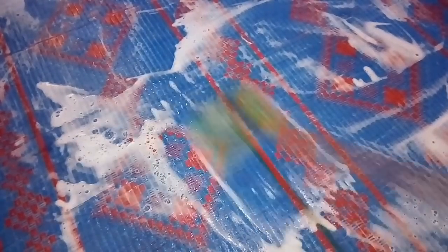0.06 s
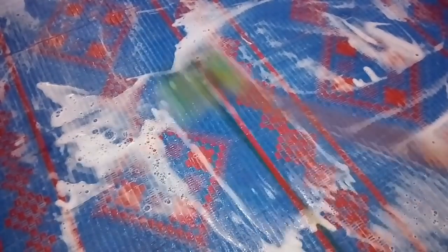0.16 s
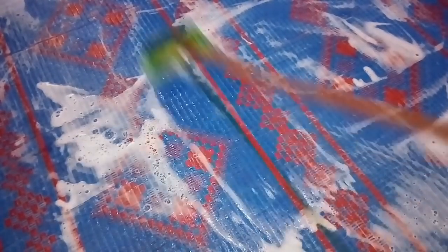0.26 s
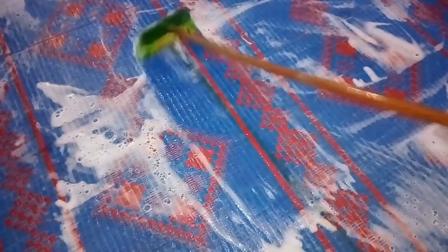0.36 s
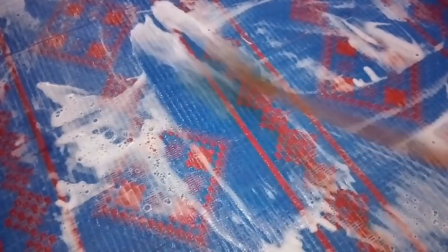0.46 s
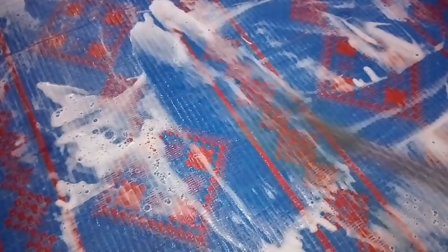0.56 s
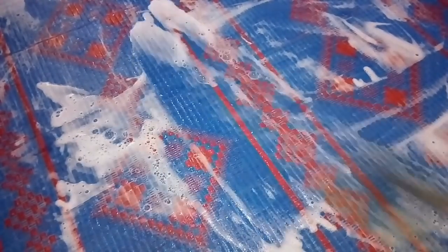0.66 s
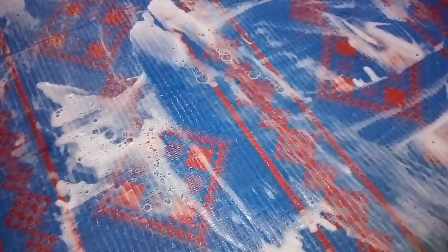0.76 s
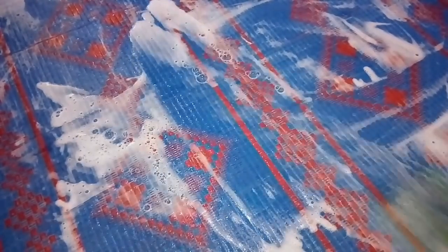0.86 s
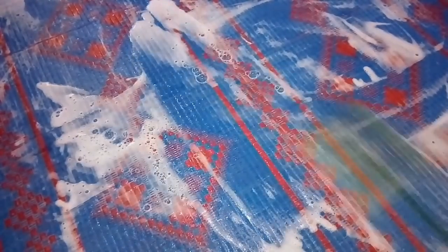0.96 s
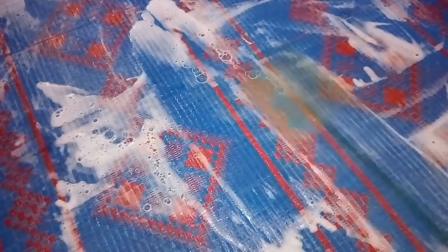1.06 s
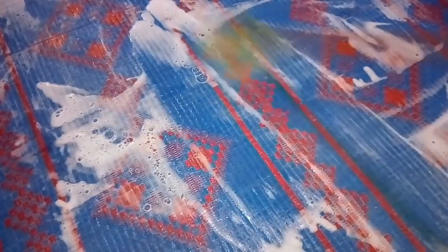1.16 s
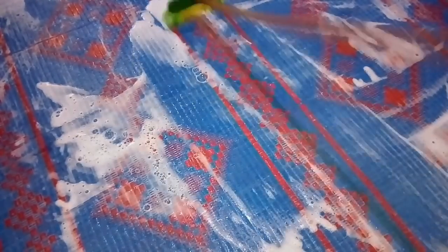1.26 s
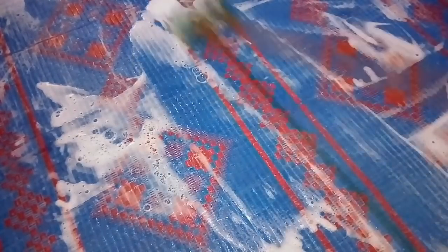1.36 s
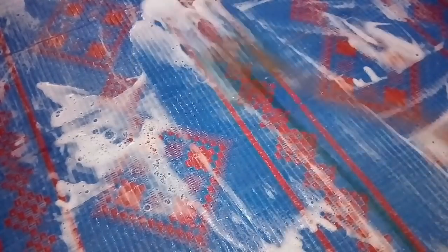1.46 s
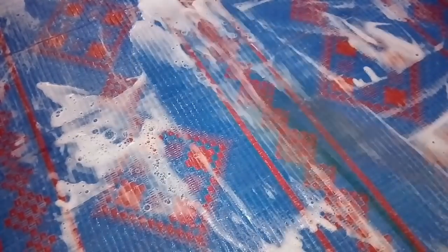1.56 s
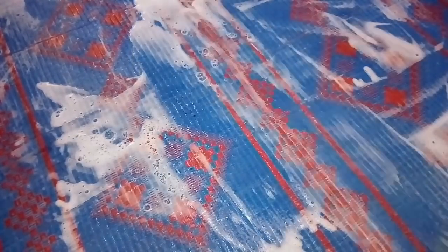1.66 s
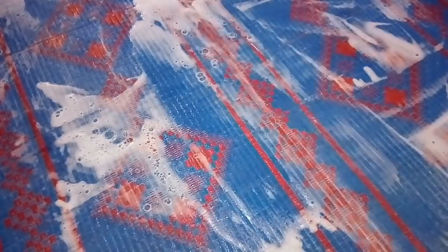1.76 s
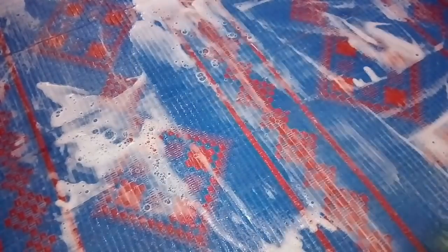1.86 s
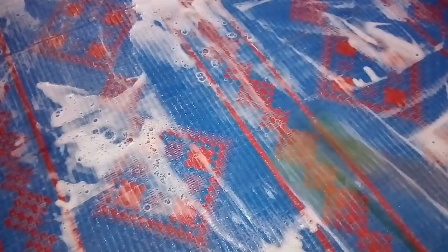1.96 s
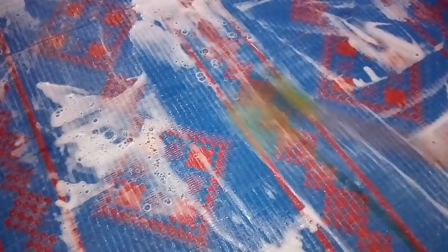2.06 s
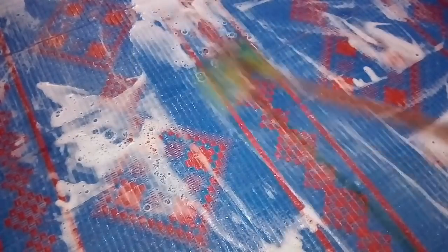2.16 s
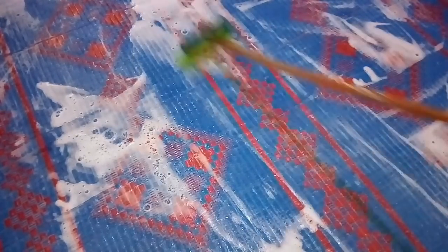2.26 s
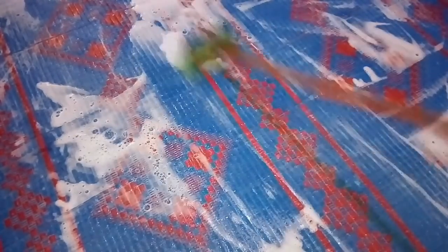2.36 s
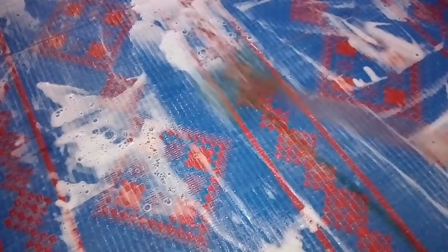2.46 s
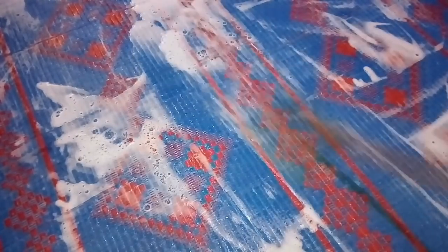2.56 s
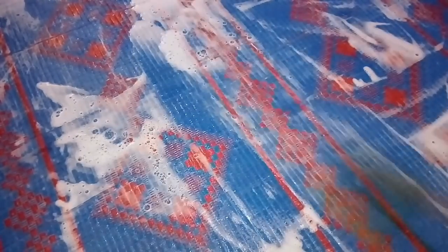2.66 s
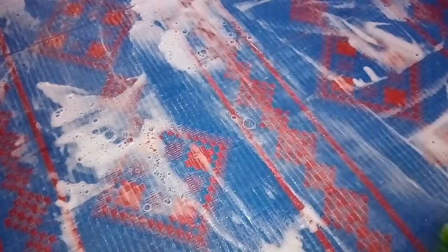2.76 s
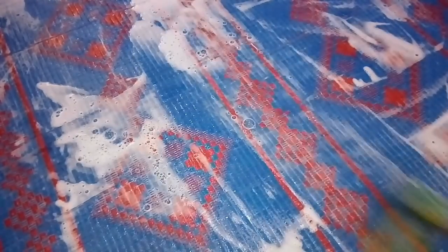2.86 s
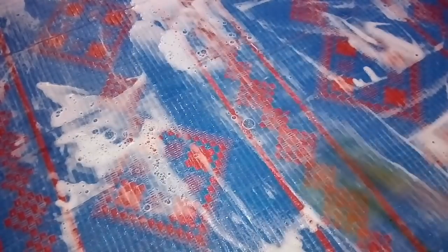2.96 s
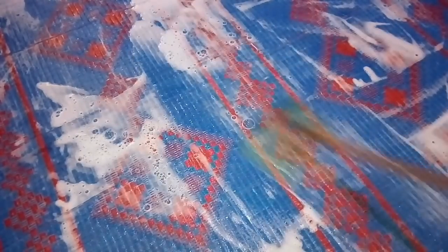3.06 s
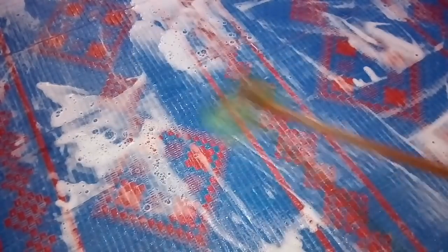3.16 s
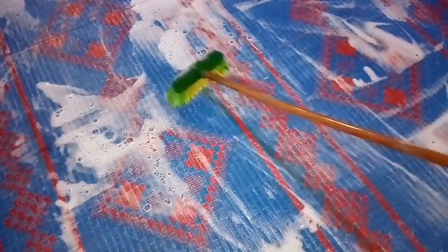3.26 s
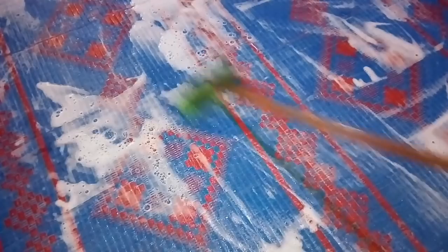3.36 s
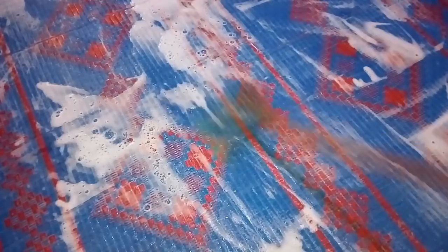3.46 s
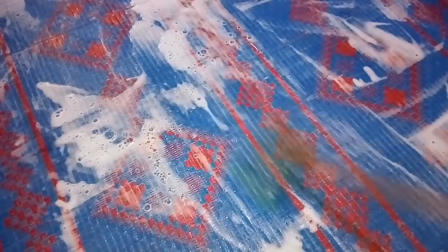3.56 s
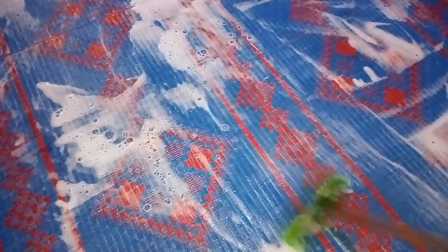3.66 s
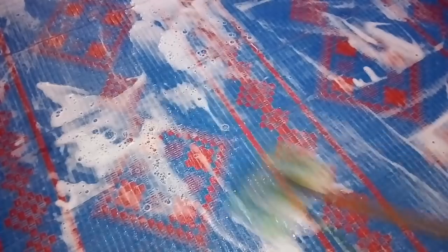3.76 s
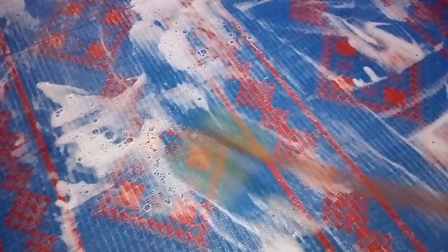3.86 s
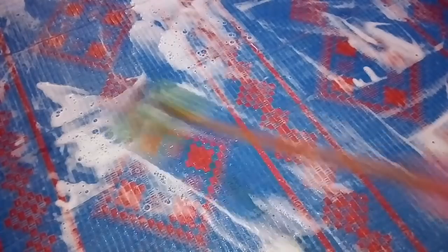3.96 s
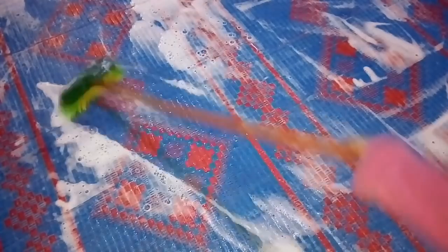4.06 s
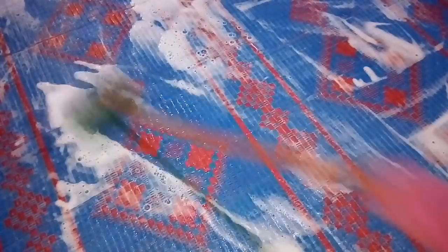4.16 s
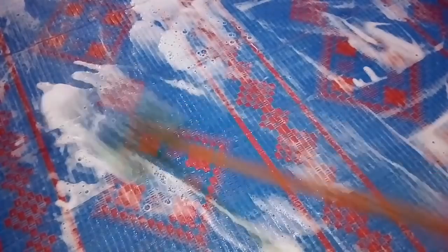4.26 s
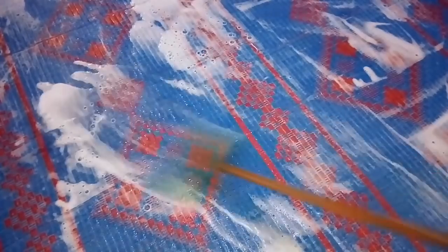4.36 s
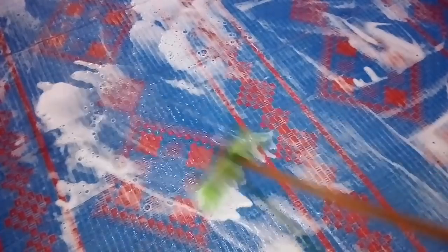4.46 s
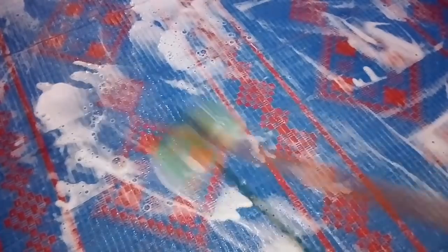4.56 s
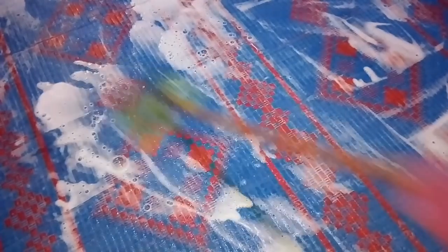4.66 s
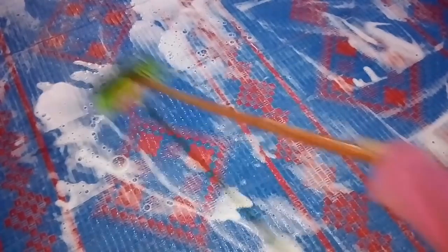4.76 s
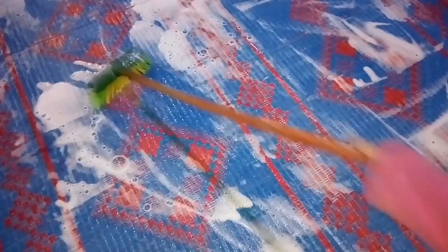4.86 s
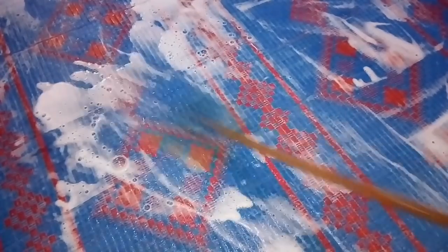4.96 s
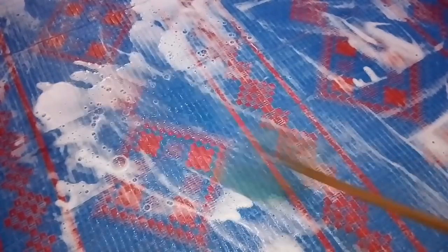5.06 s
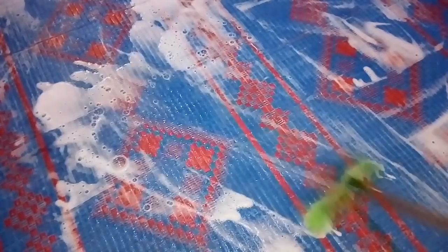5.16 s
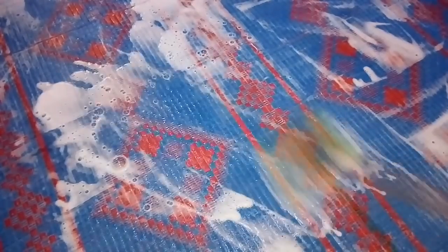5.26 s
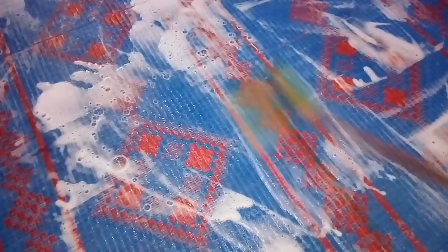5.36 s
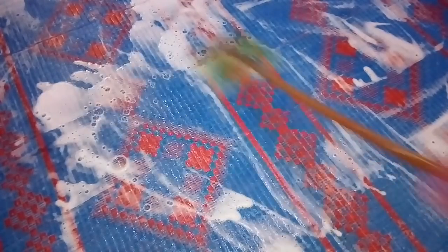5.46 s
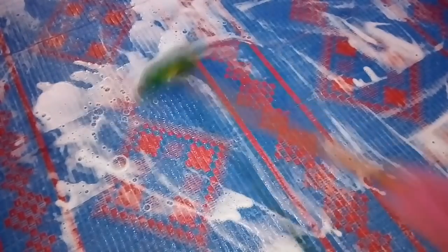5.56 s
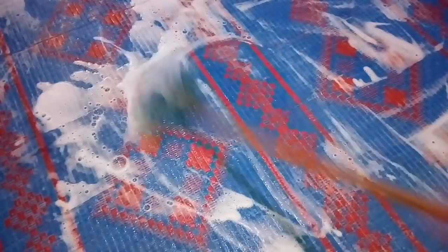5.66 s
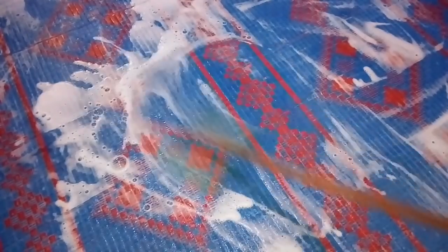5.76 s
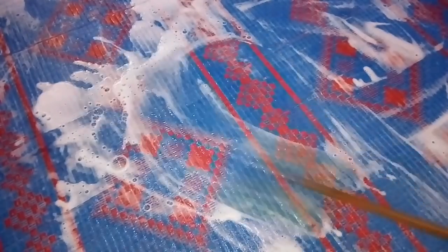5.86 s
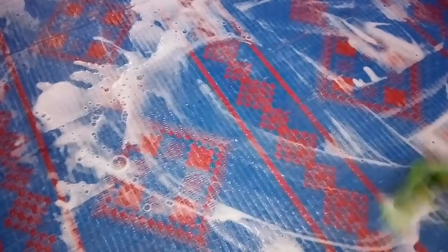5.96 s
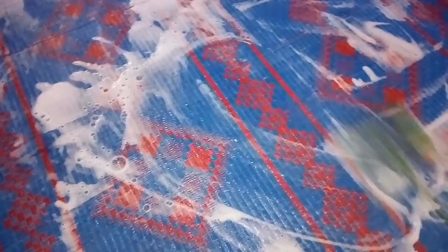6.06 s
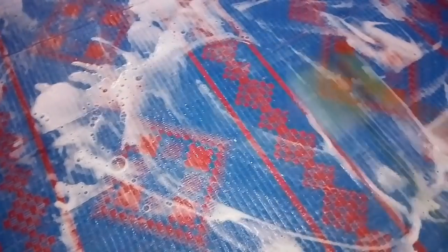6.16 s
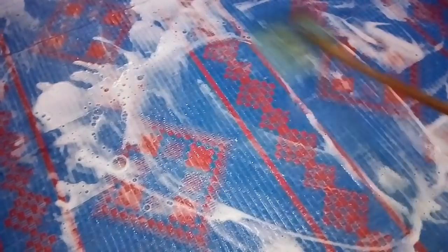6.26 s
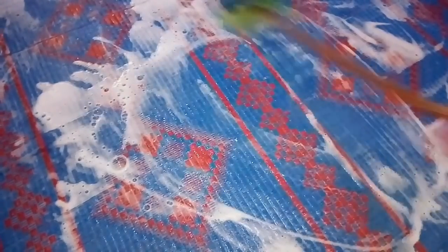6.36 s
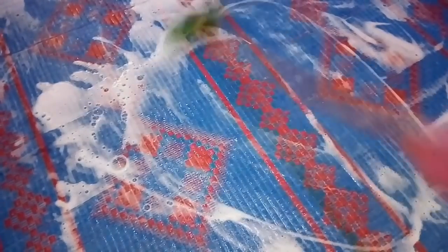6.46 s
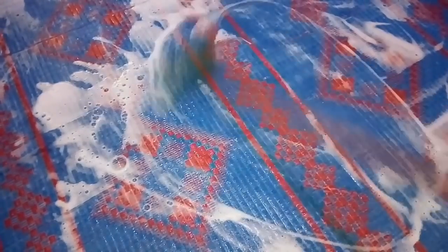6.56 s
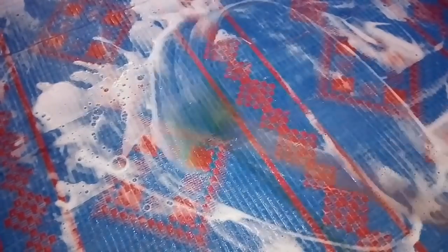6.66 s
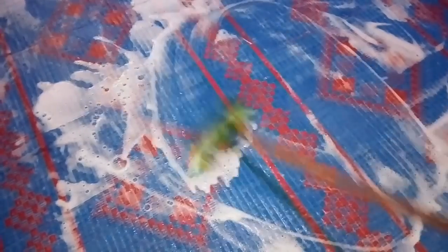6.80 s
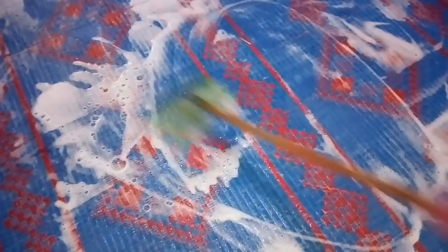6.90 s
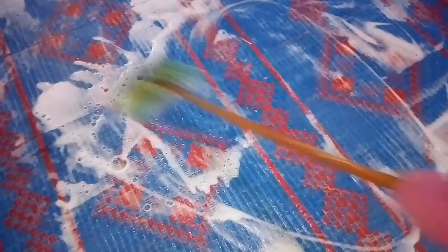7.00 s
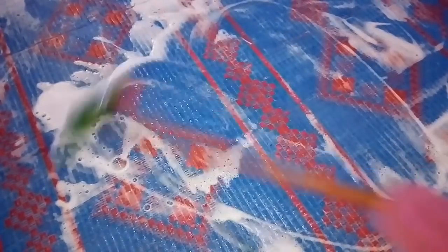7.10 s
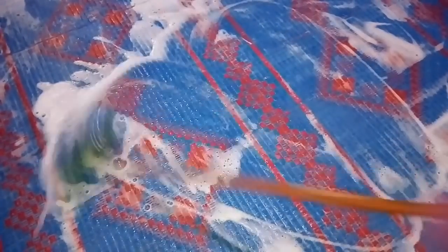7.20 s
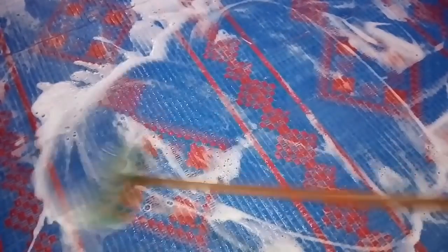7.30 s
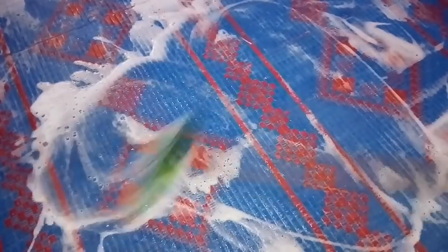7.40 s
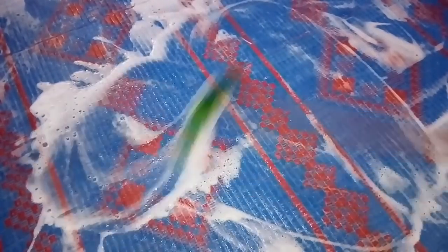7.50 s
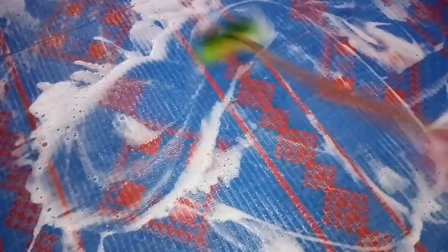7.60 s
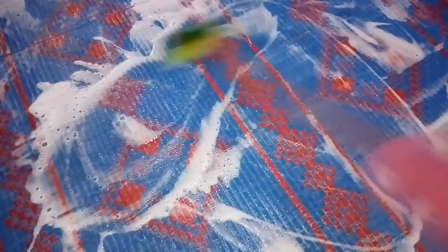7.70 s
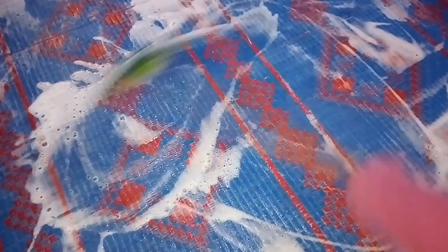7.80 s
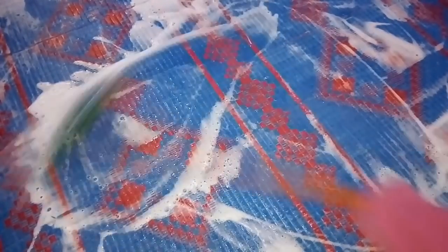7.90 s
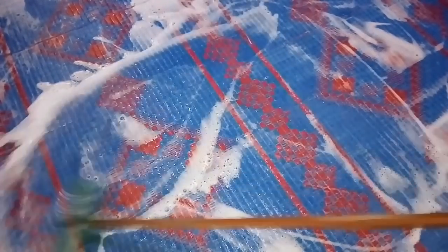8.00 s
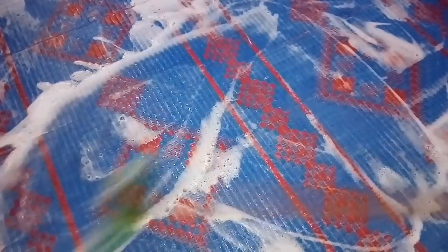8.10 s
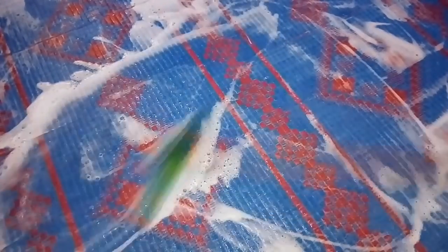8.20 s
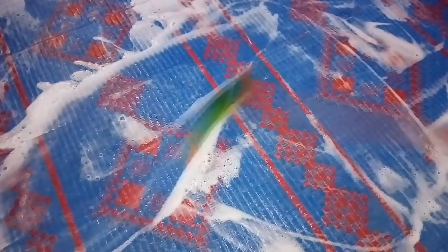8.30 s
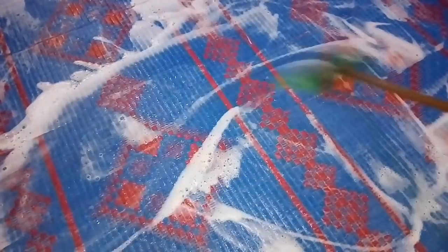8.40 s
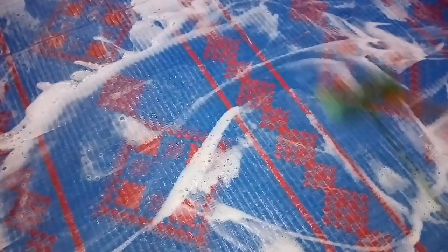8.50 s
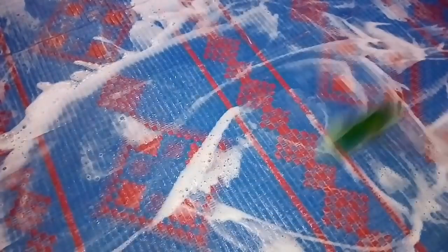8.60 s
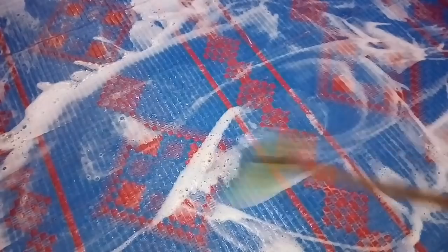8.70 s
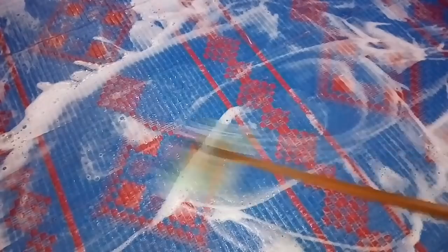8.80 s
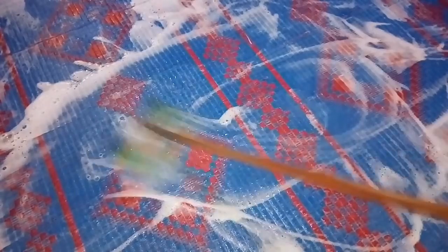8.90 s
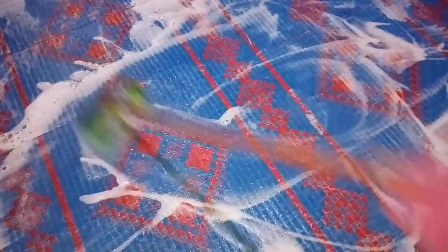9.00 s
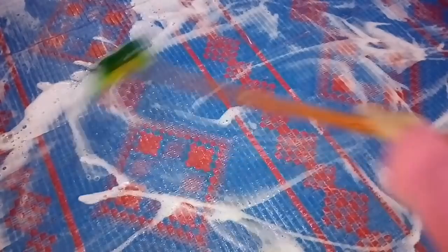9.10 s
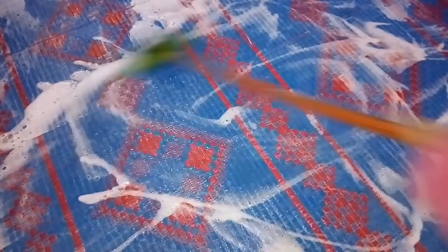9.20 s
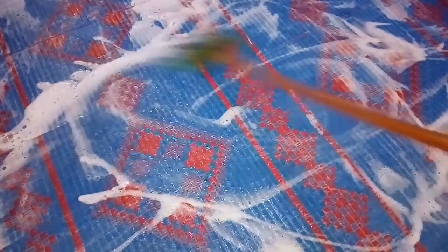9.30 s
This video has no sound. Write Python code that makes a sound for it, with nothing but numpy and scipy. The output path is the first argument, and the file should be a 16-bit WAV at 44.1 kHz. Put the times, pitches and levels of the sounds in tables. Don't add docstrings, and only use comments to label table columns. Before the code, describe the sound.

A long-handled stiff brush scrubs a soapy woven plastic mat in a small hard room, picked up close in stereo. From 0 to about 3.4 s strong strokes alternate roughly every half second, each a dense raspy hiss with fine suds fizz and a fuzzy, wavering hum as tufts cross the ribs; the wet mat drums dully beneath. Soft air bumps touch the left side near 0.7 s, with a harder thump at 2.1 s. Strokes from 3.5 to 5.9 s vary in pressure, with heavy left thumps at 4.3-4.4 and 4.8 s and a clear plastic tap at 4.25 s. The loudest, humming scrape comes at 6.2 s. Afterward the sweeps are softer and lower, with a small bright tick at 7.9 s, fading to faint swishes and more left-side air thumps around 8.9-9.1 s over very quiet room noise.

```python
import sys
import numpy as np
from scipy import signal
from scipy.io import wavfile
from scipy.ndimage import uniform_filter1d

SR = 44100
rng = np.random.default_rng(int(sys.argv[2]) if len(sys.argv) > 2 else 0)


def elevation(decibels):
    levels = np.asarray(decibels, float)
    return 10 ** (levels / 20)


def dump(signal):
    limited = np.clip(np.atleast_2d(signal).T, -1, 1)
    pcm = np.round(limited * 32767).astype(np.int16)
    wavfile.write(sys.argv[1], SR, pcm)


N = 411894
HOP = 128
LEFT_ONLY = np.array([[0], [-90]])


def evened(x):
    return x / np.sqrt(np.mean(x ** 2) + 1e-20)


def read(points, hz):
    f, value = np.transpose(points)
    return np.interp(np.log(hz + 1), np.log(f + 1), value)


def add(mix, s, sound):
    part = mix[max(round(s * SR), 0):][:len(sound)]
    part += sound[:len(part)]


def wander(size):
    once = uniform_filter1d(rng.standard_normal(N), size)
    return evened(uniform_filter1d(once, size))


def swell(middle, db, before, after, blunt, lead=0):
    u = np.arange(N // HOP + 2)[:, None] * HOP / SR + lead - middle
    reach = np.where(u < 0, before, after)
    return elevation(db - 20 * abs(u / reach) ** np.maximum(blunt, 1)) ** 2


def even(rows, lead=0):
    s, db, half = np.transpose(rows)
    return swell(s, db, half, half, 1.5, lead)


def spread(frames):
    return np.interp(np.arange(N) / HOP, np.arange(len(frames)), frames)


def level(power, rest_db):
    return spread(10 * np.log10(power.sum(axis=1) + elevation(rest_db) ** 2))


def tune(rows, rest_db):
    s, hz, db, half = np.transpose(rows)
    power = swell(s, db, half, half, 1.5)
    distance_s = abs(np.arange(len(power))[:, None] * HOP / SR - s)
    weight = power + 1e-12 * np.exp(-20 * distance_s)
    return spread((weight * hz).sum(axis=1) / weight.sum(axis=1)), level(power, rest_db)


def resonate(x, hz, width_hz, steady=0):
    turn = np.exp(2j * np.pi * np.cumsum(hz) / SR)
    r = np.exp(-np.pi * width_hz / SR)
    once = signal.lfilter([1 - r], [1, -r], x / turn)
    low = signal.lfilter([1 - r], [1, -r], once)
    return evened((turn * low).real / (abs(low) + 1e-6) ** np.clip(steady, 0, .9))


# (middle [s], frequency [Hz], change [dB], half length [s])
HEAD_TILTS = [(0.802, 4230, -2, 0.15), (1.55, 1500, -2.5, 0.15), (2.27, 1800, 3, 0.061),
              (2.28, 4500, 0, .05), (3.0, 2100, 1.5, 0.081), (3.28, 2200, 3, .07), (3.398, 4500, 7, .04),
              (3.784, 4950, -2.5, 0.11), (4.1, 1400, 6, .08), (4.2, 3800, -4, 0.046), (4.533, 1700, 4, .07),
              (4.7, 3300, 2, .05), (4.85, 1500, 5, .1), (5.267, 5240, -5.5, 0.056), (5.42, 5800, 2, 0.093),
              (5.75, 5500, -1, .08), (5.8, 1440, 3, .12), (5.9, 5300, -4, 0.045), (6.0, 6200, 4, 0.059),
              (6.088, 4730, -4.5, 0.083), (6.05, 2300, 5, .04), (6.25, 1400, -2, .09),
              (6.294, 3800, 3.5, .05), (6.6, 4900, -2.5, 0.13), (6.8, 2800, 3, .04),
              (7.075, 2600, -5.5, 0.072), (7.382, 4900, -5, 0.071), (7.63, 1590, -3, 0.11),
              (7.62, 4900, 3, 0.13), (7.85, 5300, 2.5, 0.1), (8.28, 2000, 2, .05), (8.43, 1400, -4, .1),
              (8.42, 6000, 1.5, .07), (8.8, 3500, 2, .08), (8.923, 6260, 2, 0.18), (9.28, 1500, -8, .07),
              (0.89, 4960, -2, 0.052), (1.054, 1500, 2, .12), (2.55, 3000, 1.5, 0.11),
              (6.74, 4000, -2, .03), (7.1, 4000, -3, 0.077), (0.153, 1500, 1.5, .1),
              (3.68, 3500, -2, 0.058), (5.05, 7000, -0.5, .1)]


def tilts(hz, t):
    s, middle_hz, db, half = np.transpose(HEAD_TILTS)
    octaves = np.log2((hz[:, None] + 1) / middle_hz)
    band = np.exp(-(octaves / 0.36) ** 2)
    return (band * db) @ np.exp(-((t - s[:, None]) / half[:, None]) ** 2)


# (frequency [Hz], left-right likeness [0 to 1])
PORT_LIKENESS = [(60, 0), (130, .2), (290, .72), (640, .2), (1400, .05), (2500, .12), (5000, 0), (15000, 0)]
# (frequency [Hz], left minus right [dB])
PORT_BALANCE = [(60, 0), (180, 1), (550, 1.5), (1650, -1.5), (4970, 0.5), (15000, 7.5)]


def coloured(pair, spectrum, patchy_db, tilted=False):
    frame = {"nperseg": 512, "noverlap": 512 - HOP}
    hz, t, (a, b) = signal.stft(pair, SR, **frame)
    patches = rng.standard_normal((len(t), len(hz))).T
    patches = uniform_filter1d(patches, size=7, axis=0)
    patches = evened(uniform_filter1d(patches, size=24, axis=1))
    same = np.clip(read(PORT_LIKENESS, hz), -1, 1)[:, None]
    lean_db = read(PORT_BALANCE, hz)[:, None]
    right = same * a + np.sqrt(1 - same ** 2) * b
    z = np.array([a * elevation(lean_db / 2), right * elevation(-lean_db / 2)])
    gain_db = read(spectrum, hz)[:, None] + patchy_db * patches
    if tilted:
        gain_db = gain_db + tilts(hz, t)
    out = signal.istft(z * elevation(gain_db), SR, **frame)[1][:, :N]
    return out / np.sqrt(np.mean(out.mean(axis=0) ** 2))


# (frequency [Hz], density [dB per Hz])
ROOM_SPECTRUM = [(18, -1.5), (30, -26), (95, -5), (169, -6), (257, -5.5), (391, -5.5), (1490, -0.5),
                 (1830, -3), (2140, -3.5), (11800, -34), (15700, -71)]


def room_tone():
    return elevation(-60.5) * coloured(rng.standard_normal((2, N)), ROOM_SPECTRUM, 2.2)


# (middle [s], eddy rate [Hz], level [dB], half length [s])
EDDIES = [(0.66, 90, -53.5, 0.2), (0.86, 94.5, -54, 0.11), (2.19, 94.7, -52, 0.058),
          (4.46, 108, -46, 0.041), (8.75, 79.6, -56, 0.045), (9.05, 101, -45.5, .17),
          (9.27, 78, -63, 0.097), (1.72, 170, -65, .1), (2.78, 140, -70, .08), (3.38, 90, -72, .12),
          (5.05, 130, -69, .12), (5.6, 110, -69, .12), (6.8, 100, -71, .1)]


def draughts():
    hz, db = tune(EDDIES, -102)
    return elevation(db) * resonate(rng.standard_normal(N), hz, 120) * elevation(LEFT_ONLY)


# (time [s], peak level [dB], swing rate [Hz], length [s])
GUSTS = [(0.686, -31, 73, 0.021), (0.701, -31, 78, 0.022), (0.726, -34.5, 126, 0.0098),
         (0.774, -39.5, 90, 0.018), (2.123, -34, 109, 0.007), (2.136, -17.5, 108, 0.013),
         (2.155, -31, 95, 0.017), (4.333, -16.5, 113, 0.0086), (4.345, -19.5, 109, 0.018),
         (4.364, -25, 114, 0.018), (4.397, -27, 155, 0.024), (4.409, -18.5, 150, 0.0089),
         (4.419, -13, 200, 0.0066), (4.428, -26, 126, 0.024), (4.799, -20, 139, 0.01),
         (4.832, -35, 120, 0.0091), (8.9, -31, 139, 0.0087), (8.916, -21.5, 127, 0.012),
         (8.939, -34, 114, 0.05), (8.973, -35, 98, 0.018), (9.044, -33, 98, 0.022),
         (9.073, -33, 126, 0.0052), (9.135, -38, 98, 0.034), (4.785, -36, 141, 0.017),
         (9.112, -38, 110, 0.016), (8.745, -47, 75, 0.025), (9.255, -48, 75, 0.025),
         (4.44, -32, 130, 0.015), (4.404, -36, 540, 0.014), (4.412, -29.5, 338, 0.011),
         (4.418, -36, 560, 0.01), (4.338, -34, 320, 0.013), (2.136, -36.5, 330, 0.014),
         (0.62, -43, 100, 0.02), (0.65, -43, 110, 0.02), (0.81, -45, 90, 0.02)]


def puffs():
    out = np.zeros(N)
    chance = rng.random((len(GUSTS), 2))
    u = np.arange(-.03, .06, 1 / SR)
    for (s, db, hz, length), (start, push) in zip(GUSTS, chance):
        width = np.where(u < 0, .4, .5) * length
        turn = 2 * np.pi * (hz * u * (1 - 17.5 * u) + start)
        swing = np.cos(turn) + elevation(-26) * np.cos(2.23 * turn) + elevation(-32) * np.cos(3.02 * turn)
        swing += elevation(-19) * np.cos(2 * np.pi * (50 * u + push))
        add(out, s - .03, elevation(db) * np.exp(-(u / width) ** 2) * swing)
    return out * elevation(LEFT_ONLY)


# (time [s], peak level [dB], ring frequency [Hz], share of the full ring time [ratio])
HEAD_TAPS = [
    (4.252, -25.5, 2900, .9),
    (4.2586, -35, 2900, 1.3),
    (4.4986, -46, 2850, 1),
    (6.2034, -40, 2850, 1),
    (7.9288, -30, 5000, .3),
]
# (frequency over the ring [ratio], level [dB], time to fall 60 dB [s])
HEAD_MODES = [(1.0, 0, .011), (1.33, -5.5, .011), (1.8, -20, .006), (2.45, -11, .006), (3.3, -18, .004)]


def ticks():
    out = np.zeros(N)
    t = np.arange(900) / SR
    for s, db, hz, share in HEAD_TAPS:
        ring = np.zeros(len(t))
        for ratio, mode_db, t60 in HEAD_MODES:
            ring += elevation(mode_db - 60 * t / (share * t60)) * np.sin(2 * np.pi * ratio * hz * t)
        add(out, s, elevation(db + 6) * ring * (1 - np.exp(-t / .0005)))
    return np.array([elevation(1.5) * out, elevation(-3.5) * np.roll(out, shift=2)])


# (time [s], length [s], frequency [Hz], width [Hz], level [dB])
MAT_CATCHES = [(0.0, 0.11, 245, 90, -62), (0.935, 0.15, 2300, 1200, -47.5), (1.005, 0.22, 210, 200, -53.5),
               (1.005, 0.25, 520, 700, -50.5), (1.019, 0.29, 1066, 90, -55.5),
               (1.93, 0.15, 1660, 160, -50.5), (1.955, 0.12, 2900, 1500, -52), (1.96, 0.12, 900, 90, -54),
               (2.93, 0.12, 2400, 1300, -50), (3.46, 0.15, 1370, 300, -55), (4.56, 0.09, 3300, 700, -53),
               (4.63, 0.1, 5500, 1200, -55), (5.27, 0.2, 300, 200, -61), (5.99, 0.14, 223, 80, -61),
               (7.11, 0.2, 477, 110, -63), (7.399, 0.16, 338, 110, -52.5), (7.5, 0.13, 5200, 1500, -55),
               (7.79, 0.18, 560, 120, -59), (7.875, 0.07, 2480, 120, -53.5), (8.16, 0.21, 320, 90, -61),
               (7.51, 0.05, 5200, 300, -56), (7.8, 0.07, 5700, 400, -58), (6.03, 0.12, 5900, 400, -56),
               (6.04, 0.25, 620, 500, -54)]


def catches():
    out = np.zeros((2, N))
    for s, length, hz, width_hz, db in MAT_CATCHES:
        a, b = rng.standard_normal((2, SR // 2))[:, :round(length * SR)]
        drum = resonate(np.array([a, .35 * a + .93 * b]), np.full(len(a), hz), width_hz)
        for side, sound in zip(out, drum):
            add(side, s, elevation(db) * sound * signal.windows.tukey(len(a), .45))
    return out


# (time [s], length [s], start rate [Hz], end rate [Hz], level [dB])
SPEED_GLIDES = [(0.18, 0.21, 717, 676, -55.5), (0.56, 0.12, 1030, 975, -54), (0.94, 0.15, 1060, 1060, -52),
                (1.09, 0.069, 880, 840, -52), (1.19, 0.15, 695, 667, -54), (1.08, 0.12, 370, 380, -54),
                (1.41, 0.17, 850, 1100, -55.5), (1.55, 0.1, 1090, 1160, -50.5),
                (1.68, 0.093, 807, 793, -51), (1.86, 0.17, 750, 777, -56), (1.96, 0.12, 1740, 1620, -52),
                (2.06, 0.072, 850, 800, -48), (2.14, 0.093, 700, 700, -55), (2.16, 0.068, 1700, 1620, -55),
                (2.2, 0.1, 1100, 1000, -59), (4.96, 0.15, 850, 745, -54), (4.98, 0.16, 1440, 1400, -54),
                (5.2, 0.12, 804, 830, -57), (5.93, 0.071, 430, 390, -56.5), (6.0, 0.093, 200, 238, -56),
                (6.06, 0.11, 1270, 1260, -56), (6.07, 0.12, 860, 900, -49), (6.12, 0.077, 477, 566, -54),
                (6.19, 0.12, 980, 886, -47.5), (6.33, 0.072, 920, 880, -52), (7.11, 0.081, 437, 427, -62),
                (7.16, 0.16, 518, 450, -58.5), (7.42, 0.1, 347, 380, -54.5), (7.43, 0.071, 570, 570, -57),
                (7.53, 0.1, 470, 465, -57), (7.78, 0.2, 536, 515, -54), (8.14, 0.24, 350, 355, -60),
                (8.2, 0.13, 310, 302, -59), (2.56, 0.21, 877, 908, -52.5), (5.75, 0.22, 797, 740, -56.5)]


def glides():
    out = np.zeros((2, N))
    settle = 2000
    for s, length, from_hz, to_hz, db in SPEED_GLIDES:
        pair = rng.standard_normal((2, SR // 3))[:, :round(length * SR) + settle]
        hz = np.linspace(from_hz, to_hz, pair.shape[1])
        hum = resonate(pair + .2 * pair[::-1], hz, from_hz / 16, 0.67)[:, settle:]
        for side, sound in zip(out, hum):
            add(side, s, elevation(db + 1.5) * sound * signal.windows.tukey(len(sound), .7))
    return out


# (middle [s], ribs crossed [Hz], hum level [dB], half length [s])
RIB_CROSSINGS = [(0.05, 782, -45.5, 0.36), (0.29, 680, -47.5, 0.11), (0.64, 1011, -47, 0.28),
                 (1.03, 1050, -48, 0.25), (1.2, 810, -45, 0.18), (1.46, 990, -53, 0.11),
                 (1.6, 1123, -39.5, 0.1), (1.72, 930, -47.5, 0.12), (2.0, 920, -48, 0.12),
                 (2.1, 808, -45.5, 0.29), (2.63, 897, -46.5, 0.16), (3.09, 790, -46.5, 0.19),
                 (3.56, 1066, -51, 0.15), (3.65, 788, -53, 0.1), (3.9, 680, -46.5, .15),
                 (4.0, 767, -45.5, 0.15), (4.3, 587, -47, 0.12), (4.65, 655, -51, 0.21),
                 (5.03, 780, -46, 0.16), (5.3, 790, -46, 0.23), (5.5, 775, -47, 0.33),
                 (5.87, 752, -47.5, 0.28), (6.125, 830, -40.5, 0.12), (6.24, 920, -42, 0.13),
                 (6.37, 925, -49.5, 0.11), (6.65, 645, -54.5, 0.18), (7.0, 570, -58, .17),
                 (7.48, 580, -53, 0.24), (7.93, 613, -50, 0.24), (8.25, 583, -63, 0.58),
                 (9.0, 650, -55.5, 0.21)]
# (middle [s], strands crossed [Hz], drone level [dB], half length [s])
STRAND_CROSSINGS = [(0.04, 337, -49, 0.2), (0.68, 310, -62, 0.41), (1.05, 390, -44, 0.079),
                    (1.18, 386, -49, 0.16), (1.72, 554, -60, 0.12), (1.97, 422, -59, 0.41),
                    (2.27, 297, -60, 0.14), (2.68, 406, -56.5, 0.19), (2.9, 500, -58, 0.078),
                    (3.13, 302, -63.5, 0.21), (4.0, 460, -53.5, 0.29), (4.36, 456, -55.5, 0.25),
                    (4.58, 253, -56, 0.14), (4.8, 256, -60, 0.15), (5.4, 385, -50, 0.17),
                    (5.6, 534, -61, 0.23), (5.97, 451.5, -62, 0.17), (6.16, 480, -46.5, 0.29),
                    (6.4, 584, -61, 0.37), (6.7, 443, -60.5, 0.28), (7.0, 520, -60, .17),
                    (7.21, 484, -57, 0.18), (7.54, 363, -50.5, 0.27), (7.93, 520, -56, 0.24),
                    (8.24, 330, -55, 0.19), (8.44, 358, -60, 0.29), (8.86, 313, -60, 0.23),
                    (9.15, 224, -63, 0.32)]
# (frequency [Hz], density [dB per Hz])
MAT_RUMBLE = [(50, -52), (110, -56), (200, -9), (330, -15.5), (520, -6.5), (900, -38)]


def weave():
    rib_hz, hum_db = tune(RIB_CROSSINGS, -80)
    coarse_hz, drone_db = tune(STRAND_CROSSINGS, -84.5)
    a, b, c, d = rng.standard_normal((4, N))
    fine = np.array([a, 0.063 * a + 1.0 * b])
    coarse = np.array([c, 0.49 * c + 0.66 * d])
    rib_hz = rib_hz * (1 + 0.051 * wander(size=1200))
    hum = resonate(fine, rib_hz, 146, .1) + elevation(-4.5) * resonate(fine[::-1], 2 * rib_hz, 300)
    hum += elevation(-6.5) * resonate(fine[::-1], rib_hz, 400)
    drone = resonate(coarse, coarse_hz, 103, .3)
    pressed = elevation(0.13 * (drone_db + 63.0))
    second = elevation(-3.5) * resonate(coarse, 2 * coarse_hz, 140)
    third = elevation(-13.5) * resonate(coarse, 3 * coarse_hz, 210)
    rumble = elevation(-5) * coloured(rng.standard_normal((2, N)), MAT_RUMBLE, 2.5)
    shaken = drone + pressed * (second + third + rumble)
    return elevation(hum_db - 4.0) * hum + elevation(drone_db - 4.5) * shaken


# (fastest moment [s], bristle hiss [dB], run-up [s], run-out [s], bluntness [exponent])
BRUSH_STROKES = [(0.06, -40, 0.12, 0.25, 2.5), (0.617, -40, 0.2, 0.19, 3.5),
                 (1.063, -38.5, 0.3, 0.24, 1.37), (1.563, -39, 0.14, 0.21, 1.35),
                 (2.066, -38.5, 0.29, 0.19, 1.6), (2.678, -41.5, 0.24, 0.13, 3),
                 (3.089, -39, 0.3, 0.17, 1.26), (3.571, -44.5, 0.16, 0.097, 3.7),
                 (3.949, -43, 0.19, 0.17, 1.4), (4.315, -46.5, 0.25, 0.12, 1.8),
                 (4.644, -42, 0.27, 0.19, 1.38), (5.057, -40.5, 0.21, 0.13, 2.6),
                 (5.413, -38.5, 0.25, 0.2, 1.7), (5.875, -43, 0.3, 0.14, 2.24),
                 (6.209, -36, 0.27, 0.35, 0.82), (6.632, -51.5, 0.13, 0.12, 3.2),
                 (6.863, -44.5, 0.11, 0.5, 1.93), (7.241, -57, 0.52, 0.1, 5.1),
                 (7.554, -46, 0.26, 0.27, 1.73), (7.924, -45.5, 0.1, 0.17, 1.5),
                 (8.418, -50, 0.42, 0.25, 3.5), (8.91, -49.5, 0.68, 0.52, 1.57),
                 (9.282, -54, 0.12, 0.9, 2.0)]
# (middle [s], bristle hiss [dB], half length [s])
HAND_LEANS = [(0.25, -46, 0.13), (0.748, -45, 0.054), (0.985, -43, 0.1), (1.16, -42, 0.13),
              (1.442, -44.5, 0.1), (1.689, -40, 0.13), (2.001, -40.5, 0.083), (2.171, -44, 0.12),
              (2.59, -45, 0.093), (2.984, -38, 0.075), (3.16, -48, 0.13), (3.85, -39.5, 0.21),
              (4.031, -49, 0.072), (4.506, -45.5, 0.032), (4.713, -47, 0.11), (4.924, -52.4, 0.04),
              (5.34, -68.4, 0.19), (6.305, -42, 0.1), (7.828, -50, 0.19), (8.72, -56, 0.05),
              (8.985, -60, 0.06)]


def scrape(lead=0):
    strokes = swell(*np.transpose(BRUSH_STROKES), lead=lead)
    return np.hstack([strokes, even(HAND_LEANS, lead)])


def snaps(per_s, spread_db):
    size = elevation(spread_db * np.minimum(rng.exponential(1, (2, N)), 5))
    return size * rng.standard_normal((2, N)) * (rng.random((2, N)) < per_s / SR)


# (middle [s], fizz level [dB], half length [s])
FOAM_BANKS = [(0.06, -53, 0.11), (0.33, -70, .08), (0.52, -55, 0.14), (0.96, -49, 0.11), (1.93, -50, 0.11),
              (2.66, -58, .06), (2.95, -52, .09), (3.5, -64.5, .15), (5.36, -57, 0.12), (6.17, -56, .15),
              (6.95, -64, 0.34), (7.72, -62, 0.24), (8.4, -62.5, .51), (8.9, -60.5, 0.44), (9.34, -63, .2)]
# (frequency [Hz], density [dB per Hz])
BRISTLE_HISS = [(200, -53), (350, -23.5), (600, -11.5), (900, -6), (1300, -5), (2500, -4), (5300, -6),
                (6300, -7), (7300, -14), (7900, -21.5), (9000, -32.5)]
# (frequency [Hz], density [dB per Hz])
SUDS_FIZZ = [(7000, -22), (7900, -1.5), (10000, -3), (13700, -7.5), (14300, 2.5), (15000, 4.5),
             (15500, 4.5)]


def bristles():
    hiss_db = level(scrape(), -65)
    suds = elevation(-13.5) ** 2 * scrape(0.011)
    fizz_db = level(np.hstack([suds, even(FOAM_BANKS)]), -84)
    waver = wander(size=1500)
    hiss = coloured(snaps(9000, 1.13), BRISTLE_HISS, 1.28, tilted=True)
    fizz = coloured(snaps(12000, 2.5), SUDS_FIZZ, 1.2)
    return elevation(0.25 * waver) * (elevation(hiss_db - 1.5) * hiss + elevation(fizz_db) * fizz)


def scene():
    background = room_tone() + draughts() + puffs()
    mat = catches() + glides() + weave()
    return background + ticks() + mat + bristles()


# (frequency [Hz], depth [exponent])
EXPANSION_DEPTH = [(900, 0), (1200, .35), (7500, .4), (8000, 2.2), (13500, 2.2), (14000, .8)]


def gate(x):
    hz, t, z = signal.stft(x, SR, nperseg=2048, noverlap=1536)
    power = abs(z) ** 2 + 1e-16
    near = uniform_filter1d(uniform_filter1d(power, size=9, axis=1), size=3, axis=2)
    around = uniform_filter1d(near, size=44, axis=1)
    sink = np.minimum(near / around, 1.2) ** read(EXPANSION_DEPTH, hz)[:, None]
    return signal.istft(z * sink, SR, nperseg=2048, noverlap=1536)[1][:, :N]


def band_limit(x):
    return signal.sosfilt(signal.butter(12, 16830, fs=SR, output="sos"), x)


def record(dry):
    bass_cut = signal.butter(N=2, Wn=35, btype="high", fs=SR, output="sos")
    cut = signal.sosfilt(bass_cut, dry)
    edge = signal.firwin(numtaps=1023, cutoff=15480, window=("kaiser", 11), fs=SR)
    limited = signal.oaconvolve(gate(cut), edge[None], "same")
    return band_limit(limited)


dry = scene()
out = record(dry)
dump(out)
```